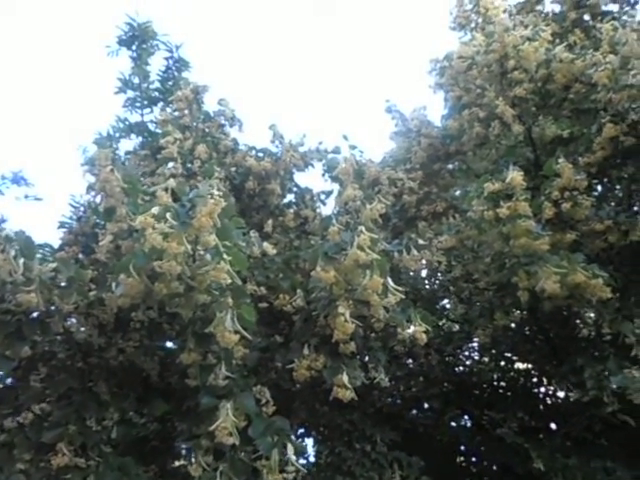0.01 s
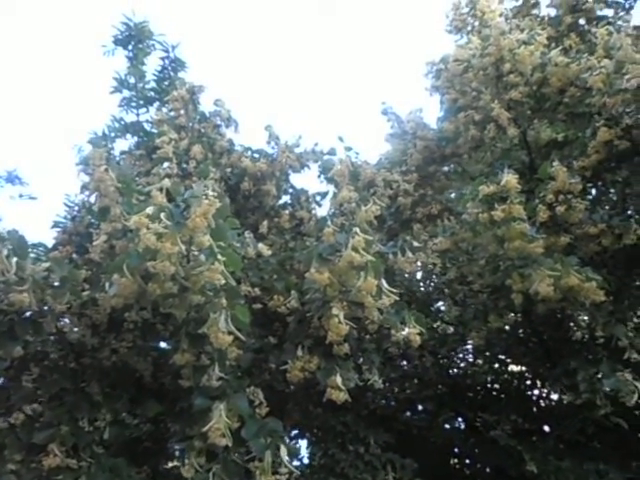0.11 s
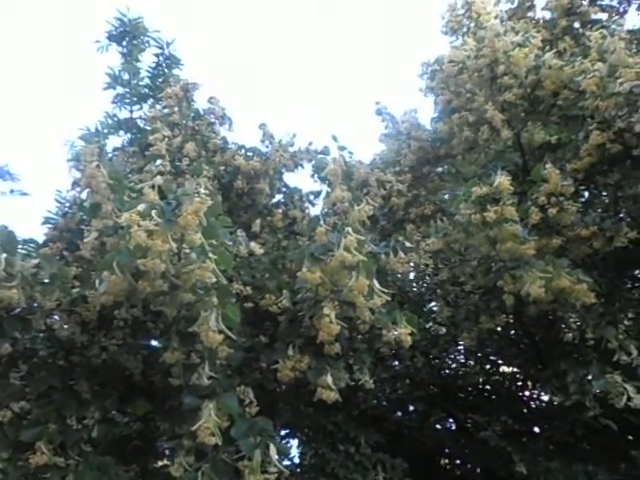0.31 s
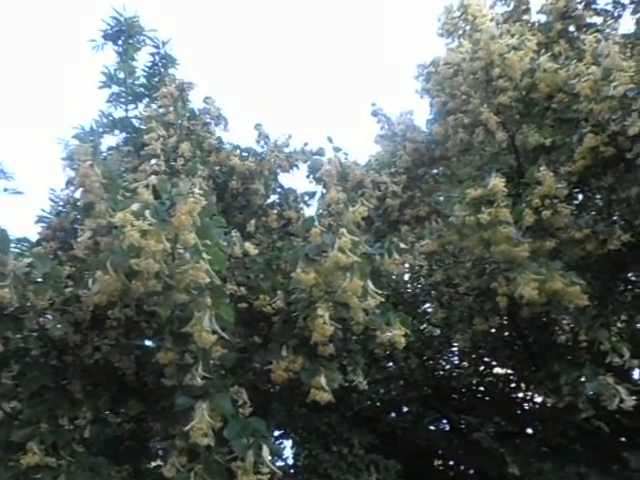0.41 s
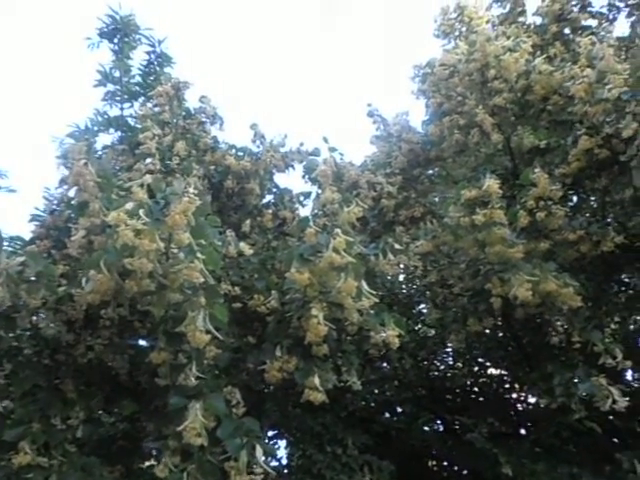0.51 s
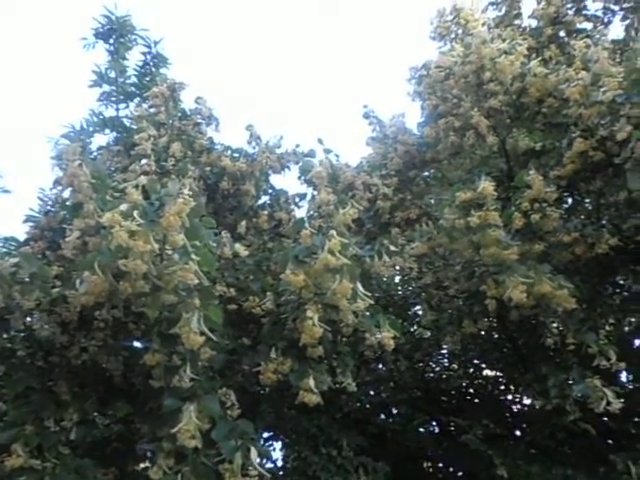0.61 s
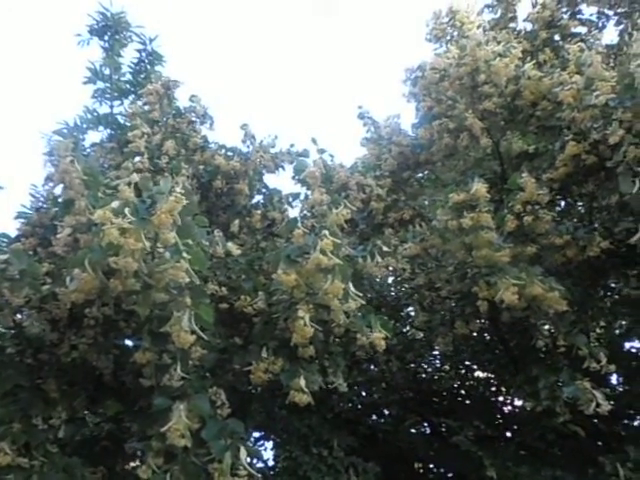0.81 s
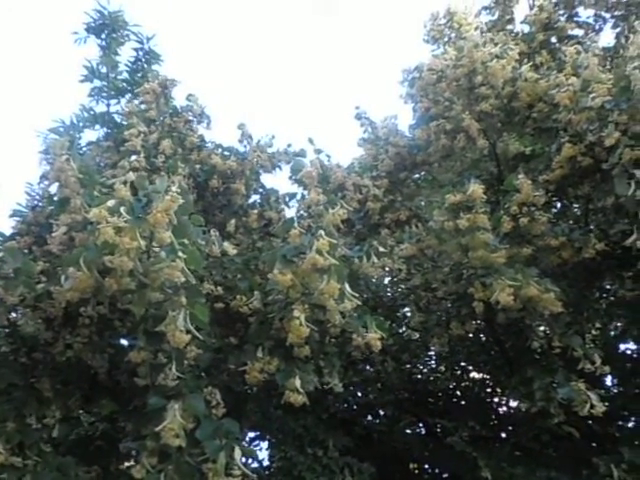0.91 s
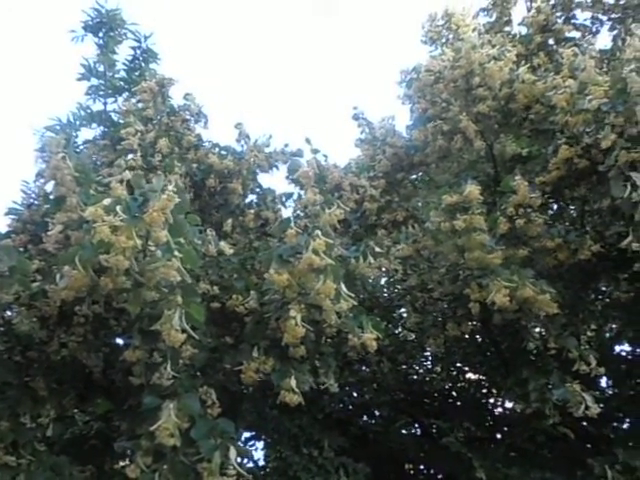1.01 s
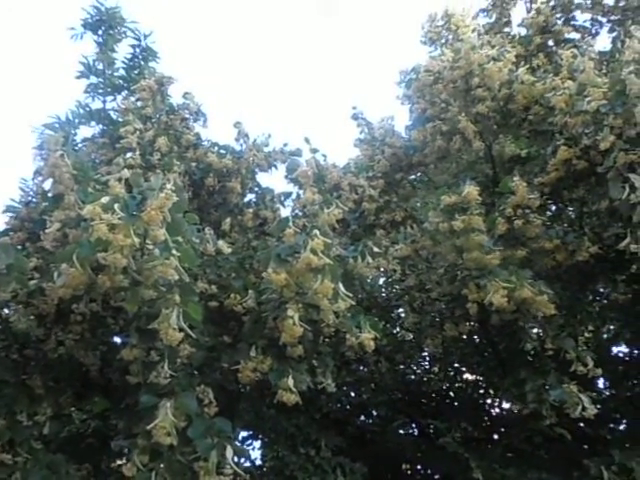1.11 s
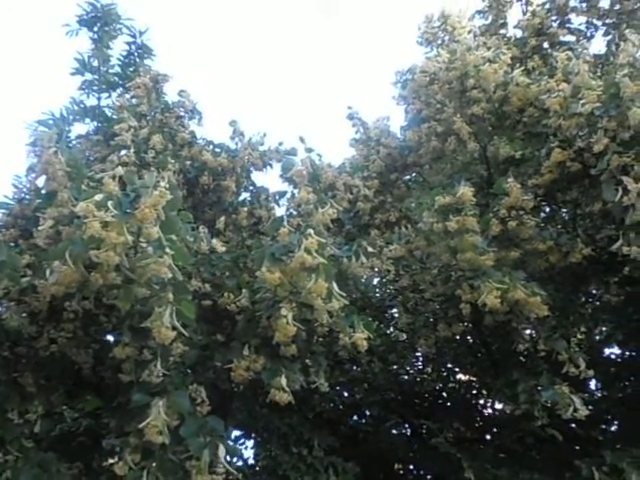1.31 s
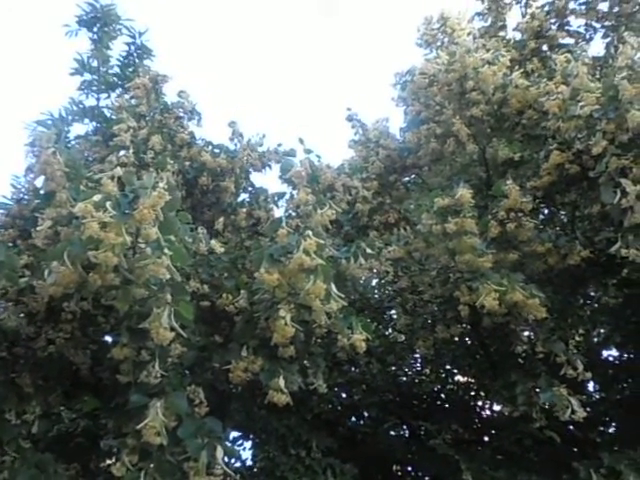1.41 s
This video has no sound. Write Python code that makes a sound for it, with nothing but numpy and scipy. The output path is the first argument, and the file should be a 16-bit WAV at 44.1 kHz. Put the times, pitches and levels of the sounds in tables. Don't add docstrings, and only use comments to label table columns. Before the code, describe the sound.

Steady low buzzing of many bees outdoors, with soft echoing bird chirps behind it, one sharp overloaded button snap near the start, and thin high electronic whine and hiss from a small cheap microphone.

```python
import sys
import numpy as np
from scipy import signal
from scipy.fft import rfft, irfft
from scipy.io import wavfile
from scipy.ndimage import uniform_filter1d

SR = 44100
rng = np.random.default_rng(int(sys.argv[2]) if len(sys.argv) > 2 else 0)


def store_pcm(level_fs):
    pcm = np.round(np.clip(level_fs, -1, 1) * 32767).astype(np.int16)
    wavfile.write(sys.argv[1], SR, np.atleast_2d(pcm).T)


def amplitude_ratio(level_db):
    exponent = np.asarray(level_db, float) / 20
    return 10 ** exponent


N = 66150
T = np.arange(N) / SR


def level(x, db):
    return x * amplitude_ratio(db) / np.sqrt(np.mean(x ** 2))


def walk(rate_hz):
    hold = int(SR / rate_hz)
    steps = np.repeat(rng.standard_normal(N // hold + 1), hold)
    return 1.3 * uniform_filter1d(uniform_filter1d(steps, hold), hold)[:N]


def fall(t, t60):
    return np.exp(-np.log(1000) * t / t60)


def bees(count=22):
    # [multiple, level/dB]
    wing_orders = [(1, -11.5), (2, -1), (3, -8), (4, -10.5), (5, -10.5), (6, -10.5), (7, -15.5), (8, -36.5),
                   (9, -28.5)]
    # [t/s, level/dB]
    swarm_swell = [(0, -2), (.15, 0), (.35, 1.5), (.45, -1), (.6, -1), (.75, 1), (.88, -2.5), (1.0, -0.5),
                   (1.07, 1.5), (1.2, -1), (1.28, 0), (1.34, 0.5), (1.42, 3), (1.5, -1.5)]
    wing_hz, spread_hz, drift_share = 181.9, 8.5, .012
    swell_db, swarm_db = 3, -46
    cycle = np.arange(1024) / 1024
    swarm = 0
    for place in np.linspace(-1.7, 1.7, count):
        phases = rng.random(len(wing_orders))
        wingbeat = 0
        for (order, db), phase in zip(wing_orders, phases):
            wingbeat = wingbeat + amplitude_ratio(db) * np.sin(2 * np.pi * (order * cycle + phase))
        drift = 1 + drift_share * walk(4) + 0.00596 * walk(40.18)
        hz = (wing_hz + spread_hz * place) * drift
        bee = np.interp(np.cumsum(hz) / SR % 1, cycle, wingbeat, period=1)
        swarm = swarm + amplitude_ratio(swell_db * walk(3)) * bee
    return level(swarm, swarm_db) * amplitude_ratio(np.interp(T, *np.array(swarm_swell).T))


def air():
    # [f/Hz, density/dB per Hz]
    air_spectrum = np.array([(20, -2.5), (100, -0.5), (300, -3), (1000, -5.5), (1500, -13), (4000, -16),
                             (9000, -16), (15700, -21)])
    air_db, flicker_db = -49, 2
    f = np.maximum(np.fft.rfftfreq(N, 1 / SR), 1)
    tone = amplitude_ratio(np.interp(np.log(f), np.log(air_spectrum[:, 0]), air_spectrum[:, 1]))
    tone = tone * np.interp(f, (15740, 15760, 15860, 15900), (1, 1, .8, 0))
    low_share = 1 / (1 + (f / 1500) ** 2)
    low = irfft(rfft(rng.standard_normal(N)) * tone * np.sqrt(low_share), N)
    high = irfft(rfft(rng.standard_normal(N)) * tone * np.sqrt(1 - low_share), N)
    return level(low * amplitude_ratio(flicker_db * walk(12.24)) + high, air_db)


def whines():
    whine_hz = (7867.15, 12709.6, 5900.4, 11800.7, 15734.3)
    whine_on = ((.25, .5), (.91, .28), (0, 1), (0, 1), (0, 1))
    # [on level/dB, off level/dB]
    whine_db = [(-54, -60.5), (-61, -90), (-75, -75), (-80, -80), (-81, -81)]
    frame_hz = 30.05
    out = 0
    for hz, (begin, share), (on_db, off_db) in zip(whine_hz, whine_on, whine_db):
        is_on = (T * frame_hz - begin) % 1 < share
        gate = uniform_filter1d(1. * is_on, size=30)
        on = gate * amplitude_ratio(on_db) * np.sin(2 * np.pi * hz * T)
        off = (1 - gate) * amplitude_ratio(off_db) * np.cos(2 * np.pi * hz * T)
        out = out + np.sqrt(2) * (on + off)
    return out


def whistles(rows, buzz_hz):
    bend, edge_s = 2.2, .004
    out = np.zeros(N)
    for start, length, from_hz, to_hz, db in rows:
        u = np.clip((T - start) / length, 0, 1)
        edge = np.clip(np.minimum(u, 1 - u) * length / edge_s, 0, 1)
        hz = to_hz + (from_hz - to_hz) * (1 - u) ** bend + buzz_hz * walk(500)
        out += amplitude_ratio(db) * edge * np.sin(2 * np.pi * np.cumsum(hz) / SR)
    return out


def rising_whistle():
    # [t/s, f/Hz, level/dB]
    rise_path = [
        (0.272, 2450, -60),
        (0.298, 2900, -46),
        (0.339, 3390, -40.5),
        (.38, 3854, -39),
        (.42, 4116, -40),
        (0.458, 4157, -47),
        (0.479, 4100, -60),
        (.54, 4150, -62),
    ]
    trill_hz, trill_depth_hz = 190, 300
    s, hz, db = np.array(rise_path).T
    trill = np.sin(2 * np.pi * trill_hz * T + 0.82 * walk(60.2))
    pitch = np.interp(T, s, hz) + trill_depth_hz * trill
    loudness = amplitude_ratio(np.interp(T, s, db, left=-120, right=-120))
    return loudness * np.sin(2 * np.pi * np.cumsum(pitch) / SR)


def garden_echo():
    t60_s, sparse_db = .5, 2.5
    t = T[:SR // 2]
    scatter = rng.standard_normal(len(t)) * amplitude_ratio(sparse_db * walk(150)[:len(t)])
    decay = fall(t, t60_s) + 0.85 * fall(t, .12)
    echo = scatter * decay * np.clip(t / 0.011, 0, 1)
    return echo / np.sqrt(np.sum(echo ** 2))


def birds():
    # [start/s, length/s, from f/Hz, to f/Hz, level/dB]
    chatter = [(.002, 0.022, 3700, 2935, -45), (.004, 0.021, 4200, 4000, -55),
               (.052, 0.016, 3600, 3210, -44.5), (.062, 0.014, 3160, 2700, -46),
               (.05, .015, 4400, 3920, -49), (.082, 0.012, 3430, 3250, -44.5),
               (.098, 0.034, 3450, 2920, -52.5), (.142, 0.012, 3800, 3650, -48),
               (.144, 0.026, 3000, 2890, -53), (.545, 0.0163, 5320, 5670, -45),
               (.546, 0.021, 4220, 5060, -46), (.562, .016, 4190, 3295, -50),
               (.566, 0.026, 5570, 5410, -51.5), (.612, 0.055, 4300, 3960, -54),
               (.63, 0.0087, 3700, 3490, -46), (.642, .03, 3400, 2838, -50)]
    # [start/s, length/s, from f/Hz, to f/Hz, level/dB]
    arched_call = [
        (.581, .042, 2700, 3750, -39),
        (.612, .028, 3350, 2800, -42),
        (.638, .05, 2750, 2200, -54),
    ]
    # [start/s, length/s, from f/Hz, to f/Hz, level/dB]
    thin_whistles = [
        (.325, .02, 6200, 5600, -63),
        (.482, .03, 6400, 5600, -60),
        (.706, .048, 6300, 4750, -57),
        (.972, .022, 5100, 4580, -59),
        (1.127, .028, 5800, 4570, -59),
    ]
    echo_db, thin_echo_db = 1, -15
    far = rising_whistle() + whistles(chatter, 170) + whistles(arched_call, 0)
    thin = whistles(thin_whistles, 0)
    to_echo = far * amplitude_ratio(echo_db) + thin * amplitude_ratio(thin_echo_db)
    return far + thin + signal.fftconvolve(to_echo, garden_echo())[:N]


def button():
    # [start/s, body level/dB, treble level/dB, ring share]
    snaps = [
        (.2331, -2, -6, .9),
        (.2373, -2, 2, .7),
        (.2400, -11, -9, .9),
        (.2474, -20, -23, 1.1),
    ]
    # [f/Hz, level/dB, t60/s]
    shell = [(610, -21, 0.016), (1066, -9, 0.017), (1573, -9, 0.021), (1884, -4.5, 0.021), (2100, -39, .17),
             (2217, 4.5, 0.012), (2573, -5.5, 0.015), (3600, -6, 0.0099), (4830, -4, 0.0076),
             (5780, 0, 0.0071), (6780, -5, 0.0074), (7800, 2.5, 0.01), (9540, -1.5, 0.0074),
             (12480, -12, 0.0059)]
    crack_db, crack_t60_s, scrape_s = -4, .016, .0007
    thump_db, thump_s = -32.5, 0.0018
    out, t = np.zeros(N), T[:SR // 4]
    noises = rng.standard_normal((len(snaps), len(t)))
    turns = rng.random((len(snaps), len(shell)))
    crack_band = signal.butter(3, (2500, 14500), "band", fs=SR, output="sos")
    for (start, body_db, treble_db, ring), noise, phases in zip(snaps, noises, turns):
        crack_fall = fall(t * (1 + t / .006), crack_t60_s * 1.5 * ring)
        hit = amplitude_ratio(crack_db + treble_db) * signal.sosfilt(crack_band, noise) * crack_fall
        for (hz, db, t60), phase in zip(shell, phases):
            if hz < 3000:
                swing = amplitude_ratio(body_db) * (1 - np.exp(-t / scrape_s))
            else:
                swing = amplitude_ratio(treble_db) * np.clip(t * hz, 0, 1) / 2
            hit += amplitude_ratio(db) * swing * fall(t, t60 * ring) * np.sin(2 * np.pi * (hz * t + phase))
        i = int(start * SR)
        out[i:i + len(t)] += hit
    u = np.maximum(T - snaps[1][0], 0) / thump_s
    thump = amplitude_ratio(thump_db) * u * np.exp(1 - u)
    rumble_cut = signal.butter(2, 400, "high", fs=SR, output="sos")
    return thump + signal.sosfilt(rumble_cut, out)


def scene():
    return (bees() + air() + birds() + button())[None]


def band_limit(x):
    return signal.sosfilt(signal.butter(12, 16810, fs=SR, output="sos"), x)


def record(dry):
    clip_level, offset = .7, -.0028
    drive = dry / clip_level
    x = clip_level * np.tanh(drive ** 3 / 3 + drive)
    f = np.fft.rfftfreq(N, 1 / SR)
    top_cut = amplitude_ratio(np.interp(f, (15700, 15800, 16800, 17000), (0, -14, -24, -90)))
    x = irfft(rfft(x) * top_cut, N)
    return band_limit(x + whines() + offset)


dry = scene()
out = record(dry)
store_pcm(out)
```